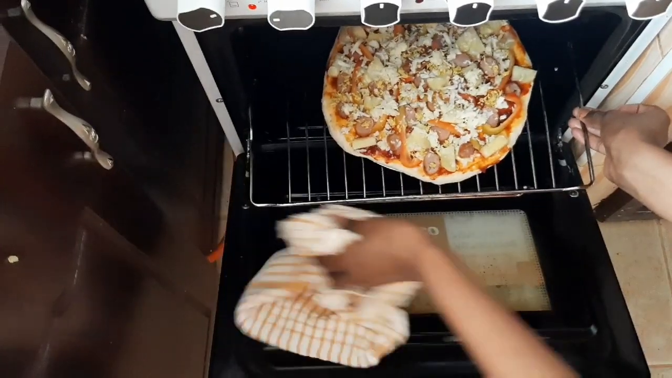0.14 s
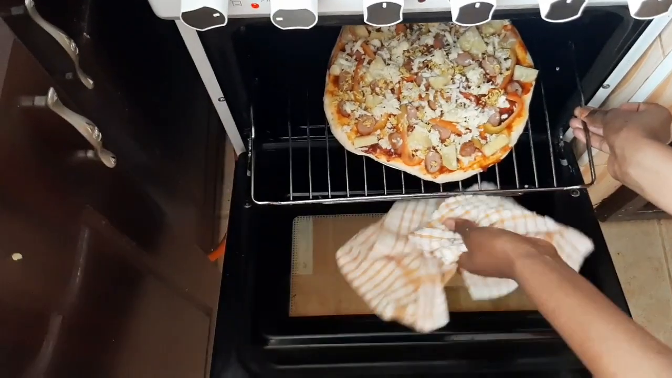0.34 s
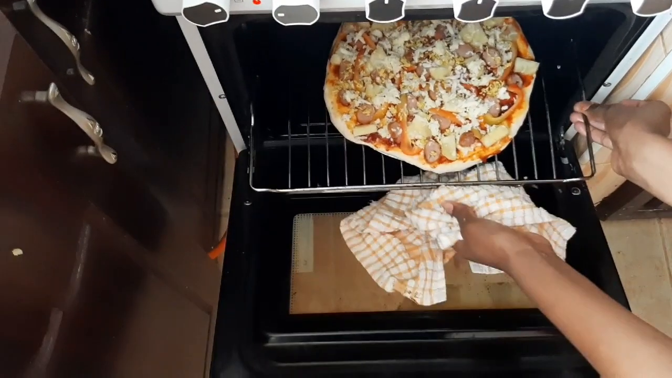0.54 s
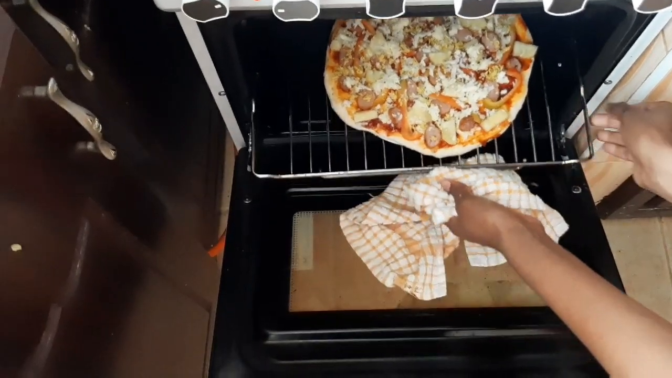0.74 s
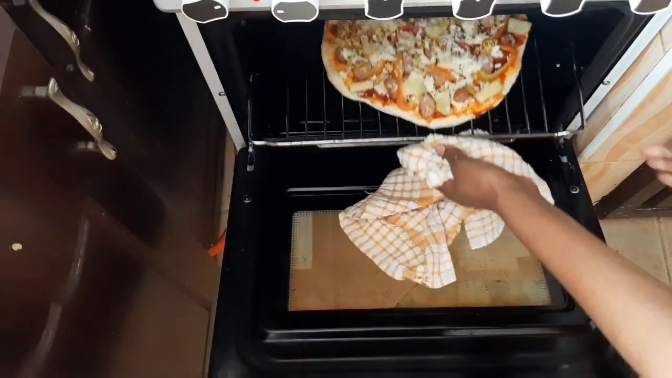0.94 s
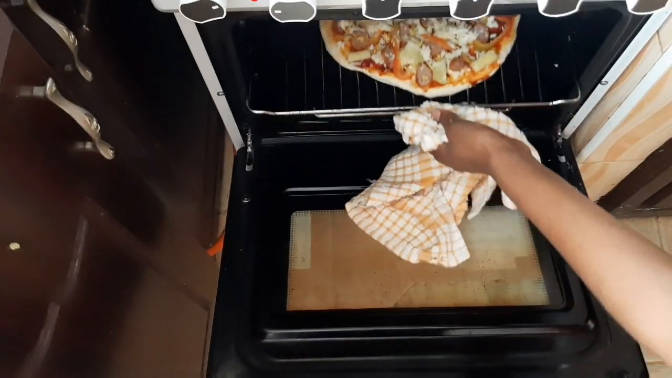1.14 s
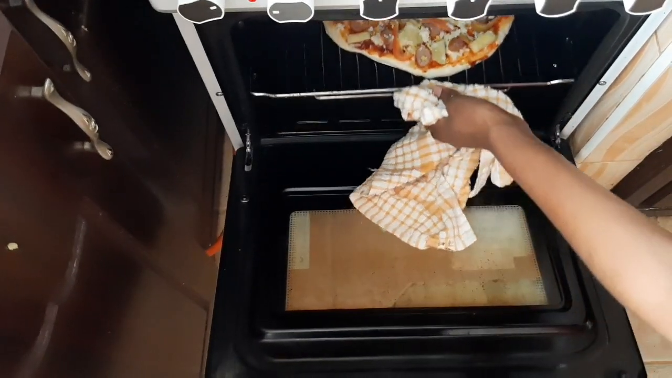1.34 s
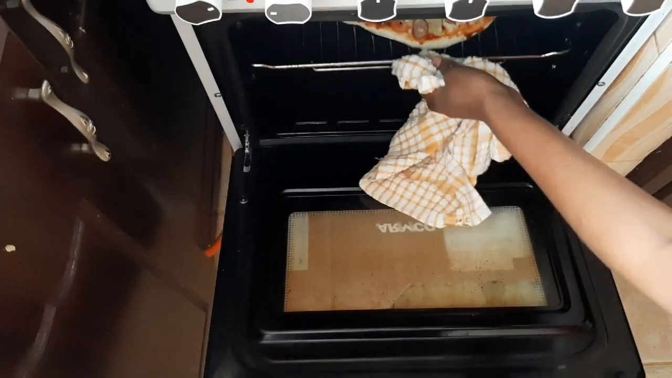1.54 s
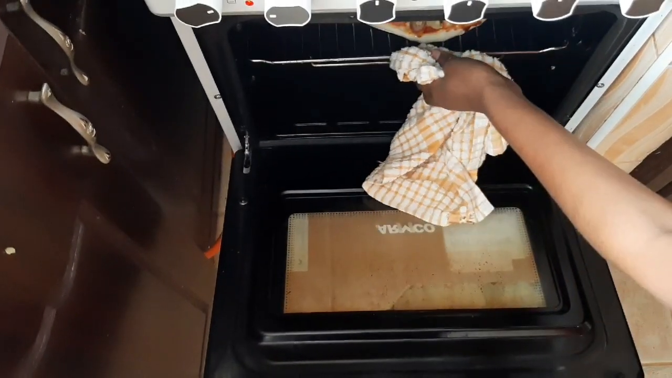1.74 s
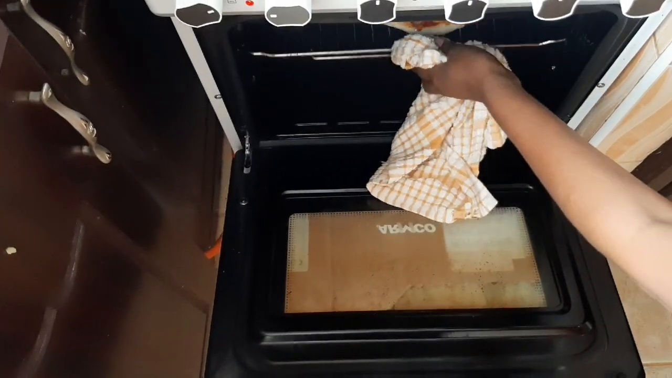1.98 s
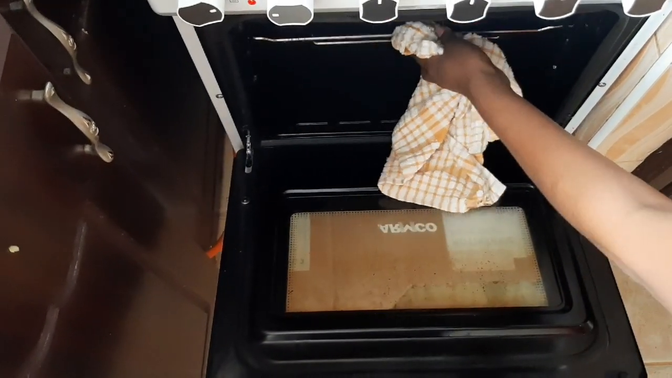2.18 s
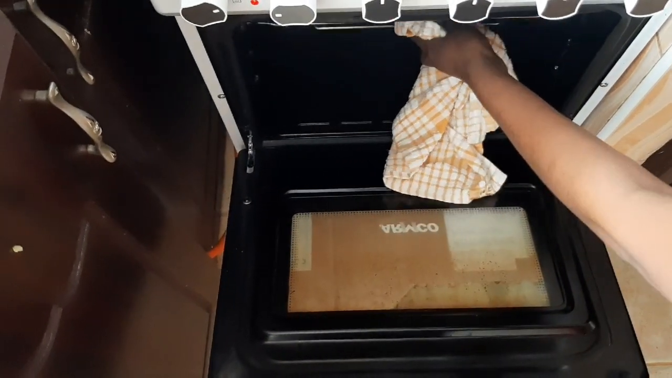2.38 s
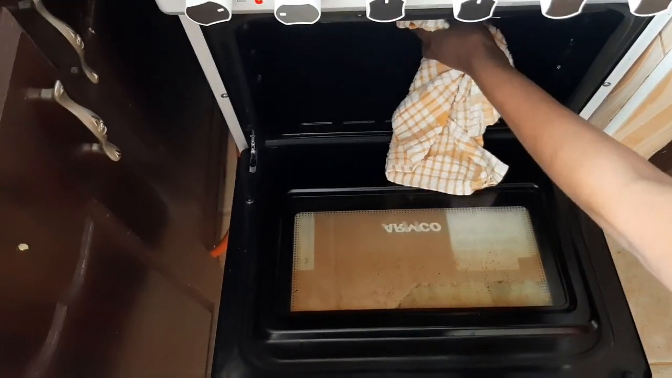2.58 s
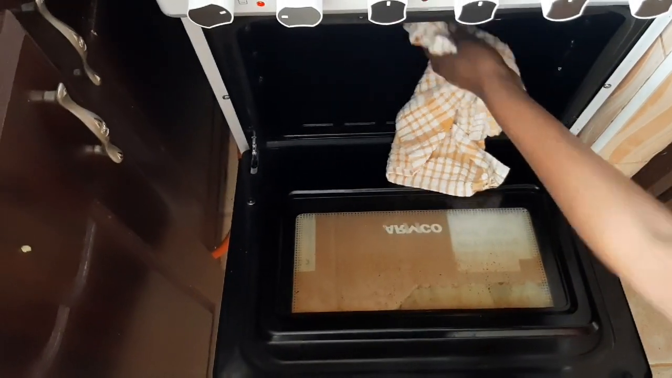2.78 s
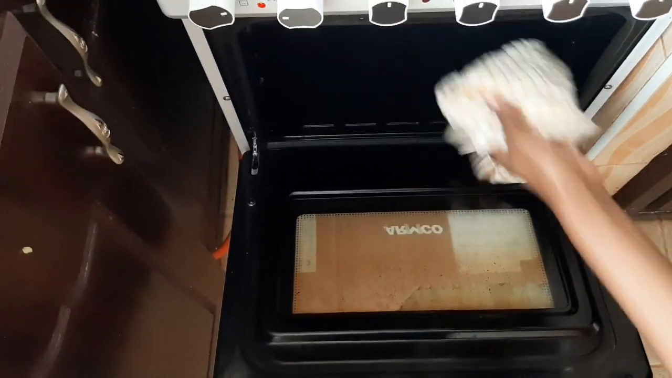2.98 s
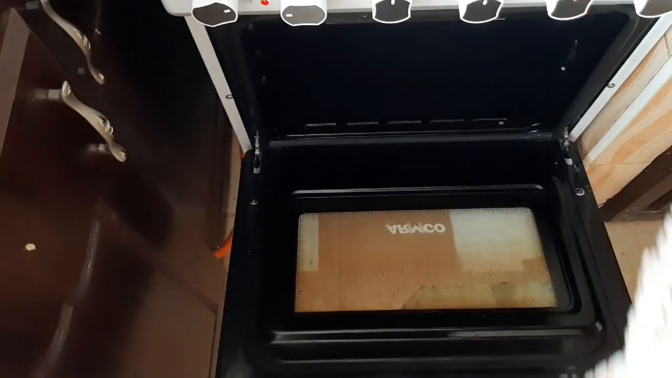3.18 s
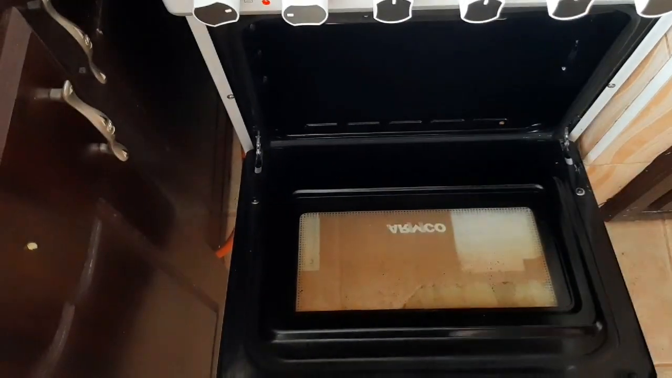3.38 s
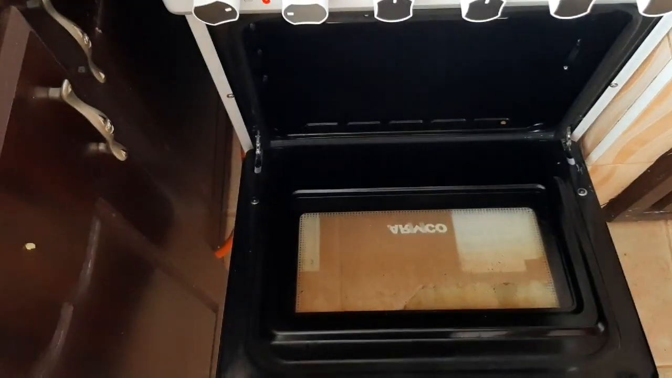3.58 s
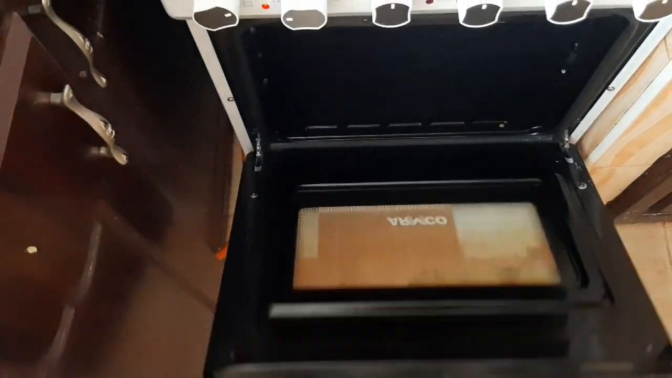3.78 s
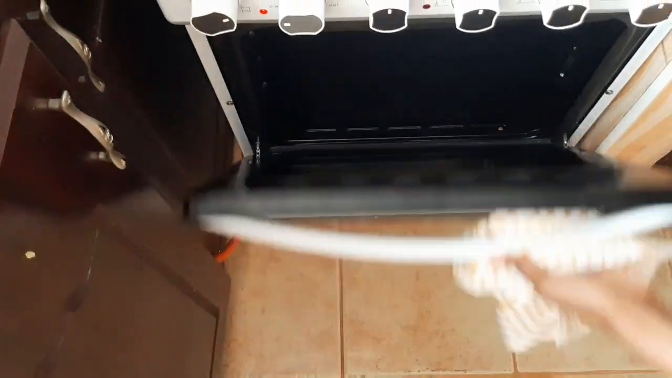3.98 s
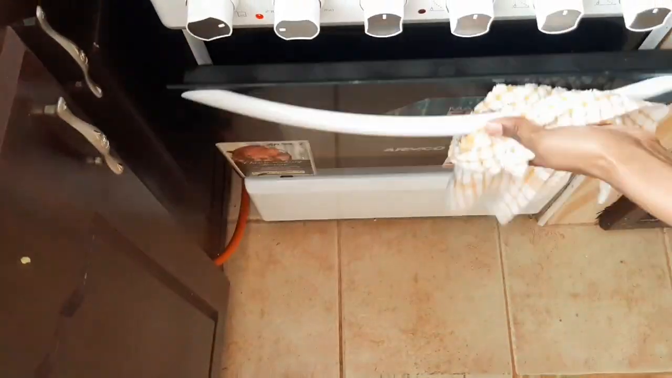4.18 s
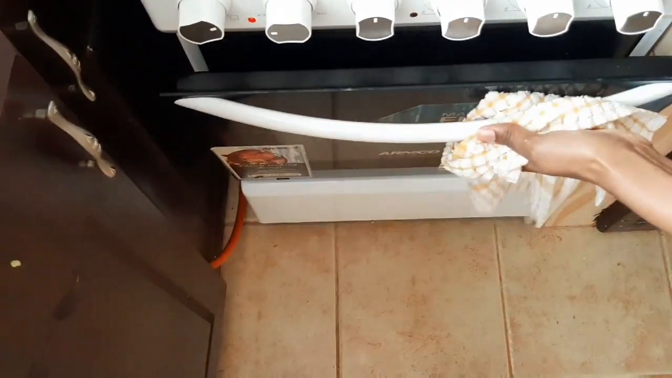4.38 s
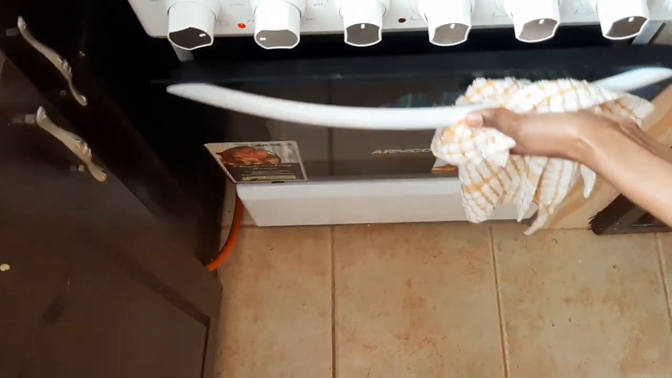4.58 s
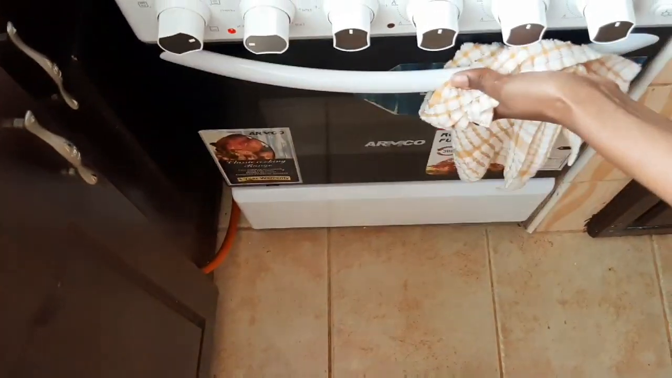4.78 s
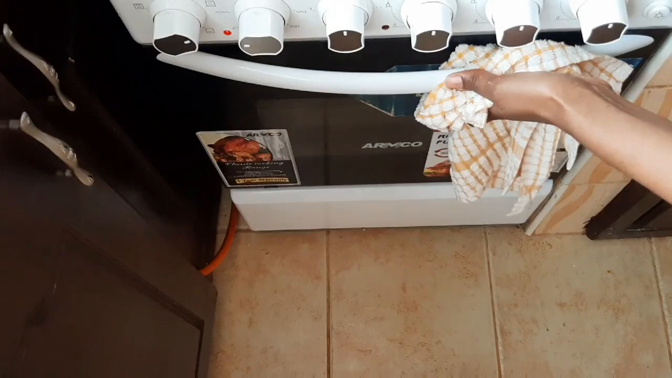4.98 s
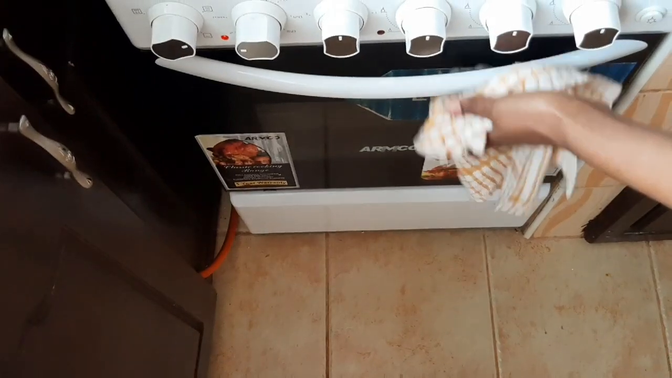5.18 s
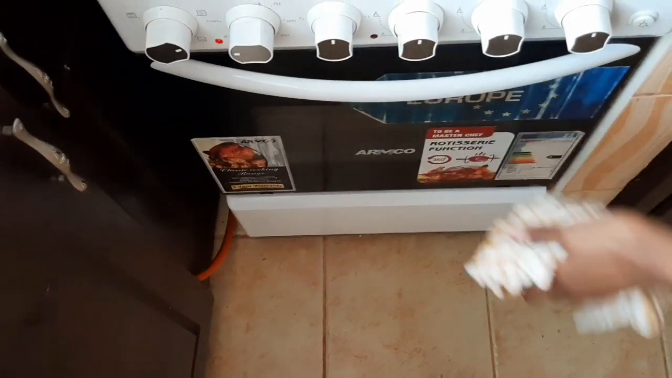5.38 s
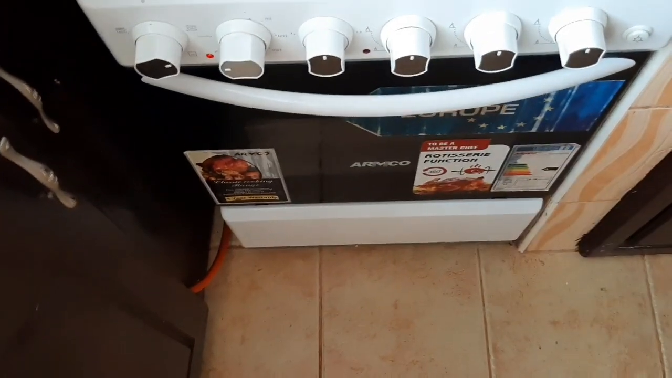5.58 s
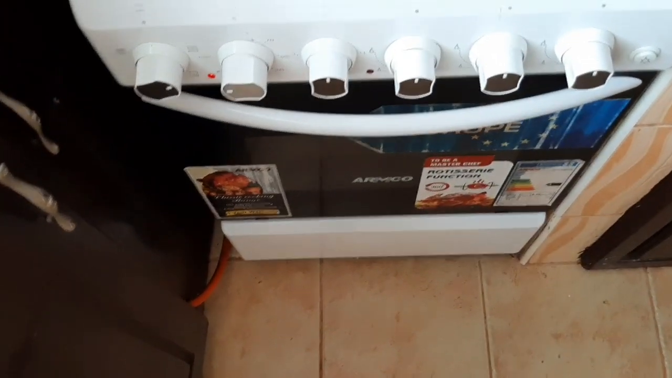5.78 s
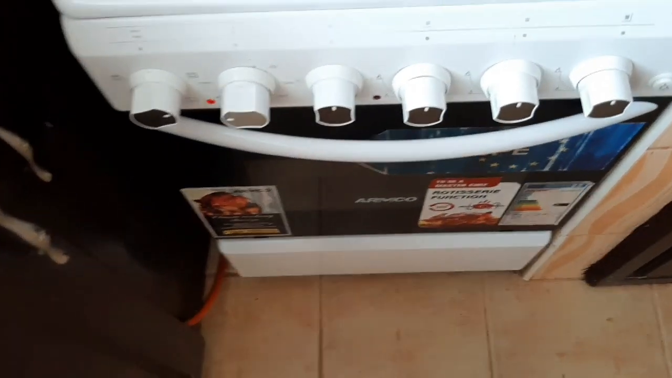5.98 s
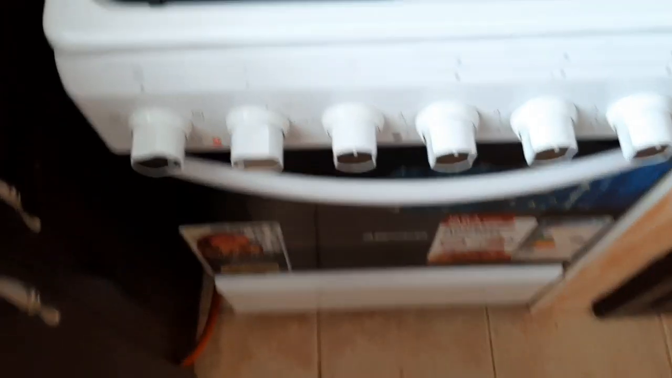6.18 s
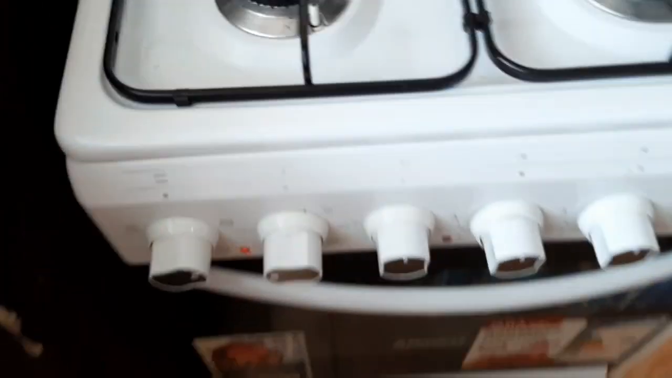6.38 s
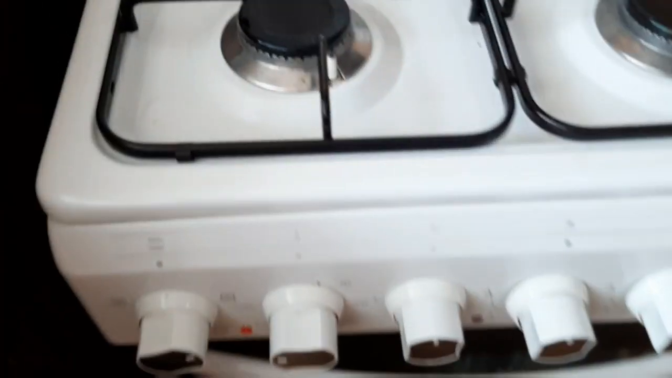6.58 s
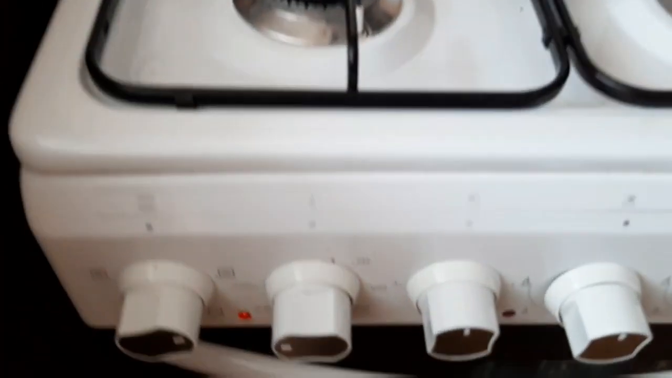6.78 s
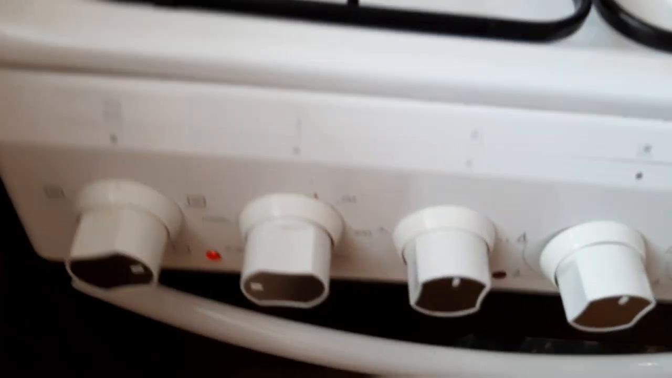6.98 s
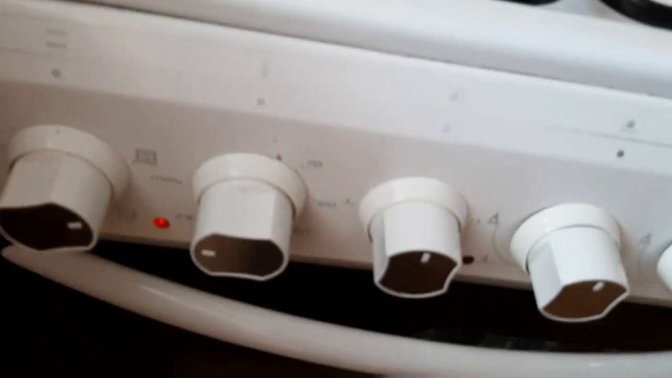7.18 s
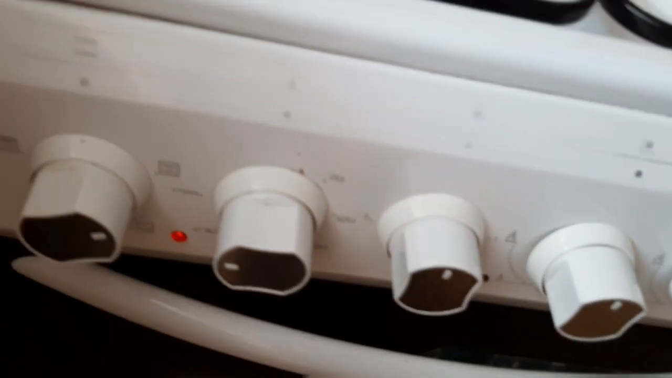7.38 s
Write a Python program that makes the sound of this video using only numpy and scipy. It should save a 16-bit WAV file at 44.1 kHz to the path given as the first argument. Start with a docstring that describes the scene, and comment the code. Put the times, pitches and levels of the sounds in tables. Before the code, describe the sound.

A wire rack scrapes and knocks into a metal oven, bumps the back wall, then the oven door lifts and bangs shut, ringing.

```python
"""A low hum wavers over room noise and a faint treble rustle, then a wire rack goes into an oven in jerks
and knocks the back wall; after a short falling groan the door is lifted and bangs shut.
Blows and scrape drive the ringing of the hollow box, its steel panels and a tiled kitchen, made from
beating modes over dense fading noise; damped sines add notes to single knocks.
A phone held close above hears it all in stereo, with little deep bass and no top treble."""
import sys
import numpy as np
from scipy import signal
from scipy.fft import rfft, irfft, next_fast_len
from scipy.io import wavfile
from scipy.ndimage import uniform_filter1d

SR = 44100
rng = np.random.default_rng(int(sys.argv[2]) if len(sys.argv) > 2 else 0)


def generate_wav(sig):
    """Save sig (samples, or channels by samples) to the path in sys.argv[1] as 16-bit PCM at SR."""
    pcm = np.round(np.clip(np.atleast_2d(sig).T, -1, 1) * 32767).astype(np.int16)
    wavfile.write(sys.argv[1], SR, pcm)


N = 327689
T = np.arange(N) / SR

# how alike left and right are: frequency_hz, likeness [0-1]
CHANNEL_LIKENESS = [(40, 0.95), (250, 0.93), (600, 0.64), (1200, 0), (3000, 0), (12000, 0)]


def undb(db):
    """Turns decibels into an amplitude factor."""
    return 10 ** (np.asarray(db) / 20)


def unit(x):
    """Scales a signal to an RMS of one."""
    return x / np.sqrt(np.mean(x ** 2))


def at_hz(table, hz):
    """Reads a (Hz, value) table on a log-frequency axis."""
    table_hz, value = np.transpose(table)
    return np.interp(np.log(np.maximum(hz, 1)), np.log(table_hz), value)


def curve(table):
    """Draws each column of a (s, ..) table as a line, sample by sample."""
    s, *columns = np.vstack(table).T
    return [np.interp(T, s, column) for column in columns]


def shape(x, gain):
    """Filters by a gain given as a function of Hz."""
    size = next_fast_len(x.shape[-1])
    spectrum = rfft(x, size) * gain(np.fft.rfftfreq(size, 1 / SR))
    return irfft(spectrum, size)[..., :x.shape[-1]]


def likeness(hz):
    """Tells how alike the two channels are at a frequency, from 0 to 1."""
    return np.clip(at_hz(CHANNEL_LIKENESS, hz), 0, 1)


def noise(count, colour):
    """Two channels of coloured noise, alike in the bass and unrelated in the treble."""
    mid = shape(rng.standard_normal(count), lambda hz: undb(at_hz(colour, hz)) * np.sqrt(1 + likeness(hz)))
    side = shape(rng.standard_normal(count), lambda hz: undb(at_hz(colour, hz)) * np.sqrt(1 - likeness(hz)))
    return np.array([mid + side, mid - side])


def walk(rate):
    """Random levels held 1 / rate s and smoothed twice over that time."""
    hold = int(SR / rate)
    steps = np.repeat(rng.standard_normal(N // hold + 1), hold)
    return uniform_filter1d(uniform_filter1d(steps, hold), hold)[:N]


def hum():
    """Low tones that swell together and each waver in level and pitch."""
    # common swell: time_s, level_db
    swell = [(0, -75), (.25, -52.5), (.6, -61.5), (3.4, -62), (4.1, -54), (5.5, -60), (6.1, -52.5),
             (6.5, -60), (7.2, -52.5), (7.43, -49)]
    # one column, a row for each tone: pitch_hz
    tone_hz = [135.5, 208, 262.6, 397.6]
    # one column, a row for each tone: level_db on top of the swell
    tone_db = [-3.5, -2.5, -5, -9]
    waver_db, pitch_waver = 4.5, 0.01435  # the second is a fraction of the pitch
    tones = 0
    for hz, db in zip(tone_hz, tone_db):
        level = undb(db + waver_db * walk(6))
        turn = 2 * np.pi * np.cumsum(hz * (1 + pitch_waver * walk(11))) / SR
        tones = tones + level * np.sin(turn)
    return np.sqrt(2) * undb(curve(swell)[0]) * tones


def room():
    """Kitchen noise, mostly low, that swells slowly and flickers a little."""
    # colour of the room: frequency_hz, level_db per Hz (relative)
    room_colour = [(15, -52), (25, -13), (59, -4), (108, -9), (127, -4), (166, -7.5), (190, -9),
                   (263, -2.5), (373, -10), (463, -9), (575, -14), (754, -13), (1330, -16), (1560, -15.5),
                   (16000, -58)]
    # slow swell: time_s, gain_db
    swell = [(0, 2), (.5, 4.5), (2, 4), (3.5, 0.5), (4.1, 3.5), (5.9, 1.5), (7.43, 5.5)]
    room_db = -52
    flicker_db = walk(10)
    return unit(noise(N, room_colour)) * undb(room_db + curve(swell)[0] + flicker_db)


def rustle():
    """Soft bright noise in uneven brushes."""
    # brushes: time_s, level_db before the random flicker
    brushes = [(0, -69), (0.23, -66.5), (0.5, -78.5), (0.7, -67), (2.97, -79), (3.0, -63.5), (3.14, -61),
               (3.4, -72), (3.62, -79), (3.72, -70), (4.15, -66), (5.4, -61), (5.76, -61), (6.04, -76),
               (6.08, -64), (6.34, -60), (6.49, -72), (6.57, -62), (6.7, -75), (7.05, -61.5), (7.25, -65),
               (7.37, -90)]
    # colour of the rustle: frequency_hz, level_db per Hz (relative)
    rustle_colour = [(1500, -18), (2500, 3), (3500, -3), (5000, -5.5), (7000, -13.5), (8500, -26),
                     (10000, -17.5), (11000, -13), (12500, -22), (16000, -19)]
    flicker_db = 2.5 * walk(25)
    return unit(noise(N, rustle_colour)) * undb(curve(brushes)[0] + flicker_db)


def response(modes, colour, modes_db, damping):
    """Answer to one tap, split from boom to tick: beating modes over dense ringing in the kitchen."""
    # how long the kitchen rings: frequency_hz, t60_s
    kitchen_t60 = [(40, 0.7), (150, 0.47), (500, 0.77), (1500, 0.59), (4000, 0.42), (12000, 0.34)]
    # one column, the borders of the five parts from boom to tick: frequency_hz
    part_edges_hz = [30, 130, 400, 1200, 3500, 18000]
    t = T[:2 * SR]
    wash = noise(len(t), colour)
    dense = 0
    for hz in 30 * 2 ** np.arange(0, 10., 1):
        octave = lambda f: np.cos(np.pi / 2 * np.clip(np.log2(np.maximum(f, 1) / hz), -1, 1)) ** 2
        fade = undb(-60 * damping * t / at_hz(kitchen_t60, hz))
        dense = dense + shape(wash, octave) * fade
    clear = 0
    for hz, db, t60 in modes:
        # opposite phase shifts make left and right as unlike as the noise is there
        lag = np.arccos(likeness(hz)) * rng.choice([-.5, .5]) * np.array([[1], [-1]])
        twin_hz = hz * (1 + 0.00562 * rng.standard_normal())  # uneven panels split each mode in two
        pair = np.sin(2 * np.pi * hz * t + lag) + 0.73 * np.sin(2 * np.pi * twin_hz * t - lag)
        # loose joints make the ring waver
        knots_s = t[::SR // 30]
        buzz_db = 3 * np.interp(t, knots_s, rng.standard_normal(len(knots_s)))
        clear = clear + undb(db + buzz_db - 60 * t / t60) * pair
    whole = unit(dense) + undb(modes_db) * unit(clear)
    parts = []
    for k, edges in enumerate(zip(part_edges_hz, part_edges_hz[1:])):
        band = signal.butter(2, edges, "band", fs=SR, output="sos")
        part = signal.sosfilt(band, whole)
        early_rms = np.sqrt(np.mean(part[:, :SR // 20] ** 2))
        # neighbouring parts meet in opposite phase: every other one is turned over
        parts.append((-1) ** k * part / early_rms)
    return parts


def blows(table, contact):
    """Forces for the five parts, ringing and crack: a first contact, then a very short rattle of loose metal."""
    force = np.zeros((2, 5, 2, N + SR))
    boom_db, rattle_s, pan_db, crack_db = contact
    # for each part from boom to tick: share of rattle, and how strongly it leans to one side
    looseness = 0.4, 0.48, 0.64, 0.84, 0.77
    aim = 0.045, 0.16, 0.24, 0.74, 0.57  # the bass has hardly any direction
    length = SR // 10
    for s, thud_db, clang_db, ring_db, tick_db in table:
        part_db = thud_db + boom_db / 2, thud_db - boom_db / 2, clang_db, ring_db, tick_db
        rattle = rng.standard_normal(length) * np.exp(-T[:length] / max(rattle_s, 1e-4))
        rattle = rattle / np.sqrt(np.sum(rattle ** 2))
        start = int(s * SR)
        for k, (db, loose, aimed) in enumerate(zip(part_db, looseness, aim)):
            push = loose * rattle
            push[0] = np.sqrt(1 - loose ** 2)  # the first contact
            side = undb(aimed * np.array([[pan_db], [-pan_db]]) / 2)
            force[0, k, :, start:start + length] += undb(db) * side * push
            force[1, k, :, start] += undb(db + crack_db) * side[:, 0]
    return force[..., :N]


def ring(force, parts, first=0):
    """Lets the forces sound the parts, from the given part upward, by convolution."""
    return sum(signal.fftconvolve(f, p, axes=1)[:, :N] for f, p in zip(force[first:], parts[first:]))


def struck(table, contact, parts, rubbing=0, snap=0):
    """Ringing of all parts plus the short crack of the three upper ones."""
    crack_s = 0.002  # decay of the first arrival of a hard contact
    ringing, crack = blows(table, contact)
    short = [part[:, :SR // 20] * np.exp(-T[:SR // 20] / crack_s) for part in parts]
    return ring(ringing + rubbing, parts) + ring(crack + snap, short, 2)


def scrape(parts):
    """Forces of the rack on its rails: uneven slips, sized so that each part rings at the level asked."""
    # the rack scrapes along its rails: time_s, level_db
    slide = [(0.45, -80), (0.75, -57.5), (0.78, -58.5), (0.95, -57.5), (1.06, -51), (1.31, -64),
             (1.37, -51.5), (1.54, -53.5), (1.78, -72.5), (2.06, -63), (2.22, -61), (2.5, -57.5)]
    # one column, the scrape from boom to tick: level_db on top of the slide
    slide_parts_db = [8.5, -0.5, 2, -0.5, -8]
    sparse = rng.random(N) < .01
    slips = unit(rng.standard_normal(N) * undb(1.7 * rng.exponential(size=N)) * sparse)
    sliding = (T > slide[0][0]) * (T < slide[-1][0])
    slips = slips * undb(curve(slide)[0]) * sliding
    gain = np.array([np.sqrt(np.sum(part ** 2) / 2) for part in parts])
    return (undb(slide_parts_db) / gain)[:, None, None] * slips


def rack():
    """The rack scrapes in and knocks: slips and blows ring the open oven and the rack."""
    # blows: start_s, thud_db, clang_db, ring_db, tick_db (force levels)
    rack_blows = [(0.645, -52, -59, -67, -83), (0.76, -55, -47.5, -45.5, -58), (0.819, -52, -55, -49, -63),
                  (0.975, -43, -54, -43.5, -61), (1.022, -40.5, -42, -58, -56),
                  (1.045, -49.5, -57.5, -50.5, -52.5), (1.103, -54, -58, -55, -54.5),
                  (1.35, -46.5, -49.5, -52, -51), (1.471, -40.5, -42, -49, -58),
                  (1.533, -46, -58, -56.5, -60), (1.638, -41.5, -46.5, -52.5, -63),
                  (1.681, -54, -49, -61, -84), (2.073, -52.5, -58, -77, -46), (2.091, -60, -52, -65, -69),
                  (2.136, -65, -56, -65, -54.5), (2.286, -53.5, -62, -62, -55), (2.391, -57, -59, -64, -57),
                  (2.422, -42.5, -67, -59, -54.5), (2.464, -49, -60, -63, -72),
                  (2.559, -37, -25.5, -40, -41.5), (2.571, -37.5, -40, -50, -45),
                  (2.634, -40, -43, -42.5, -48), (2.996, -54, -53, -60, -71)]
    # clear modes of open oven and rack: frequency_hz, level_db (relative), t60_s
    rack_modes = [(158, -13, 0.21), (202, -7.5, 3.2), (256.6, 9, 0.2), (375.9, -1, 0.64), (466, -4, 0.48),
                  (611, -8.5, 0.62), (758, -6.5, 0.68), (1054, -13, 0.13), (1109, -6, 0.39),
                  (1233, -13, 0.29), (1508, -2.5, 0.28), (2040, -12, 0.4), (2170, -17, 0.65),
                  (2320, -11, 0.67), (2750, -22, 0.58), (3330, -30, 1.2)]
    # dense ringing: frequency_hz, level_db per Hz (relative)
    rack_colour = [(30, -47), (60, -23), (100, 2), (150, 2), (300, -2), (450, -9), (700, -13), (900, -19),
                   (1400, -14.5), (1850, -19.5), (2300, -20.5), (3200, -28.5), (5000, -31.5), (8000, -41),
                   (11000, -42.5), (16000, -51)]
    # every blow: boom over thump dB, rattle length s (at least 0.0001 is used),
    # left minus right dB (before each part's aim), crack over ringing dB
    rack_contact = (5.5, -0.03, -7, -7.5)
    # clear modes against the dense ringing; how many times as fast as the kitchen that ringing fades
    parts = response(rack_modes, rack_colour, modes_db=-8.5, damping=1.01)
    return struck(rack_blows, rack_contact, parts, rubbing=scrape(parts))


def notes():
    """Short notes that single knocks sound: damped sines that take a cycle to speak."""
    # notes: start_s, level_db (peak, before onset and decay), pitch_hz, t60_s
    knock_notes = [(0.765, -35.5, 1082, 0.095), (0.978, -40.5, 1453, 0.24), (1.022, -30, 106.2, 0.29),
                   (1.47, -23, 131, 0.19), (1.636, -34, 830, 0.065), (2.15, -46, 1536, .2),
                   (2.425, -33.5, 134, 0.19), (2.557, -18.5, 240, 0.16), (2.573, -30, 1480, 0.11),
                   (4.191, -33, 493, 0.46), (4.725, -20, 91, 0.15), (4.757, -12, 43, 0.19),
                   (4.756, -18, 471.7, 0.39)]
    out = 0
    for s, db, hz, t60 in knock_notes:
        t = np.maximum(T - s, 0)
        onset = np.minimum(hz * t, 1)
        out = out + undb(db - 60 * t / t60) * onset * np.sin(2 * np.pi * hz * t)
    return out


def groan():
    """A short falling groan: a gliding tone that throbs, wobbles in pitch and carries a weak octave."""
    # glide and throb: time_s, pitch_hz before the wobble, level_db
    glide = [(2.99, 283, -47), (3.025, 253.5, -33), (3.055, 220, -45.5), (3.085, 225, -37.5),
             (3.10, 218, -51.5), (3.135, 214, -40.5), (3.17, 227, -49), (3.185, 262, -36.5),
             (3.2, 246, -60), (3.28, 238, -50)]
    hz, db = curve(glide)
    turn = 2 * np.pi * np.cumsum(hz * (1 + 0.01 * walk(42))) / SR
    gate = uniform_filter1d(1. * (T > glide[0][0]) * (T < glide[-1][0]), 400)
    return np.sqrt(2) * gate * undb(db) * (np.sin(turn) + undb(-24) * np.sin(2 * turn))


def latch():
    """Force of the catch as it snaps: one impulse on the top part, a dry crack with no ringing."""
    latch_s, latch_db = 4.6935, -16.5
    force = np.zeros((5, 2, N))
    force[-1, :, int(latch_s * SR)] = undb(latch_db)
    return force


def door():
    """The door is lifted and bangs shut: blows ring the door and the closed oven, the catch adds a dry crack."""
    # blows: start_s, thud_db, clang_db, ring_db, tick_db (force levels)
    door_blows = [(4.175, -38, -47.5, -50.5, -58), (4.188, -44, -63, -49, -52.5),
                  (4.211, -44, -36, -47, -62), (4.242, -54, -39, -44.5, -64), (4.554, -50, -66, -82, -58),
                  (4.682, -45, -63, -45, -45), (4.693, -43.5, -36.5, -38, -26), (4.726, -27, -36, -29, -32),
                  (4.744, -34, -29.5, -23.5, -27.5), (4.758, -42.5, -19.5, -26, -34.5),
                  (4.774, -40, -30.5, -31, -44), (4.81, -29, -27, -35, -60), (5.37, -53.5, -55, -58, -60.5),
                  (6.077, -61.5, -67, -71, -68), (7.411, -73, -73, -63, -52)]
    # clear modes of door and closed oven: frequency_hz, level_db (relative), t60_s
    door_modes = [(90.2, 1.5, 0.47), (195, -8.5, 3.8), (235.7, 1.5, 1.5), (460.5, 1.5, 2.17), (505, 2, 1.2),
                  (752, -3.5, 1.2), (755, -12, 3.1), (1001, -11, 1), (1120, 2.5, 1.28), (1215, 1, 1.4),
                  (1180, 6, 1.09), (1403, -1.5, 1.7), (1523, 6, 0.93), (1560, 1, 0.96), (2034, 8.5, 0.6),
                  (1760, -16, 0.11), (1890, 4, 1), (2290, -8, 0.55), (2857, -2, 0.5), (3200, -26, 0.51),
                  (3050, -28, 0.43), (3323, -1, 0.34), (3540, -1.5, 0.28), (4180, -30, 1.6),
                  (5630, -36, 0.39), (6638, -30, 0.4), (7000, -31, 0.32)]
    # dense ringing: frequency_hz, level_db per Hz (relative)
    door_colour = [(25, -42), (42, -13), (60, -6.5), (95, 2.5), (160, 0.5), (250, 0.5), (350, -4),
                   (480, -0.5), (700, -6), (1200, 1), (2000, 0.5), (3200, -7.5), (5500, -12), (8000, -18.5),
                   (10500, -15.5), (16000, -25)]
    # every blow: boom over thump dB, rattle length s (at least 0.0001 is used),
    # left minus right dB (before each part's aim), crack over ringing dB
    door_contact = (0.5, -0.46, -7, -3.5)
    # the dense ringing fades more slowly than the kitchen
    parts = response(door_modes, door_colour, modes_db=-3, damping=0.69)
    return struck(door_blows, door_contact, parts, snap=latch())


def scene():
    """Rack and door in stereo, with the other sounds set slightly to the right."""
    others = hum() + room() + rustle() + notes() + groan()
    lean = undb(np.array([[-1.2], [1.2]]))
    return others * lean + rack() + door()


def record(dry):
    """The phone drops the deepest bass, rounds the loudest peaks and cuts the top."""
    foot_hz, top_hz, ceiling = 32, 15800, .85
    foot = signal.butter(2, foot_hz, "high", fs=SR, output="sos")
    top = signal.ellip(10, .2, 80, top_hz, fs=SR, output="sos")
    dry = signal.sosfilt(foot, dry)
    rounded = ceiling * np.tanh(dry / ceiling)
    return signal.sosfilt(top, rounded)


dry = scene()
out = record(dry)
generate_wav(out)
```